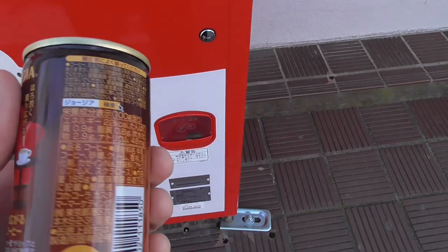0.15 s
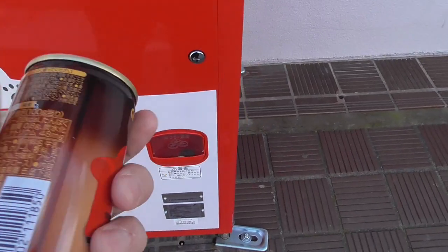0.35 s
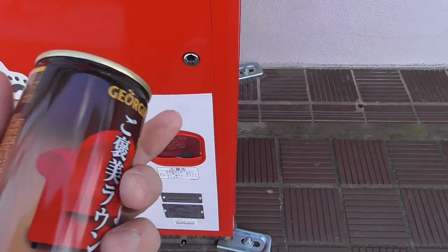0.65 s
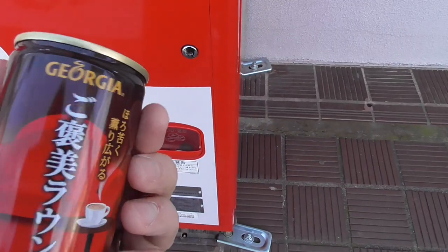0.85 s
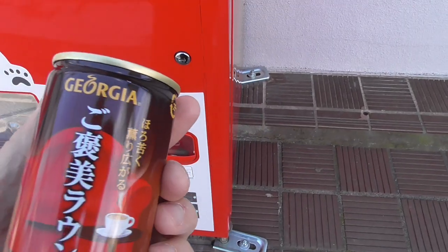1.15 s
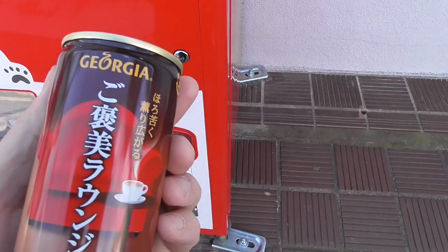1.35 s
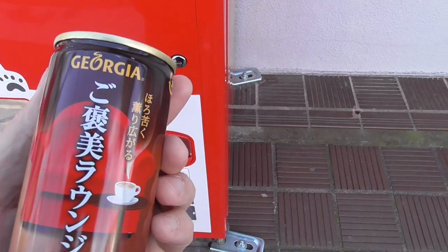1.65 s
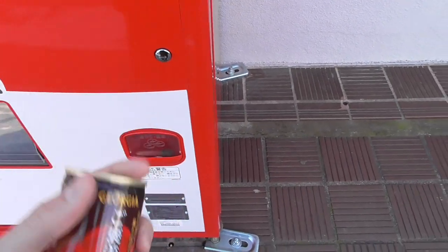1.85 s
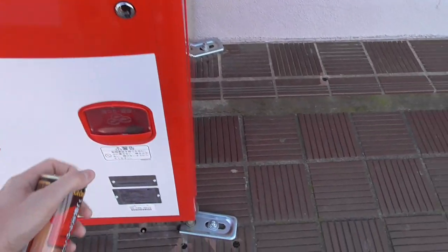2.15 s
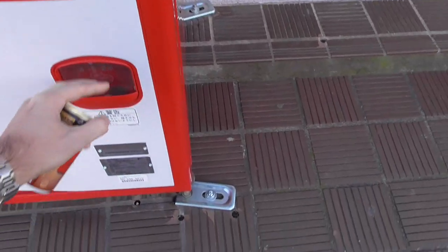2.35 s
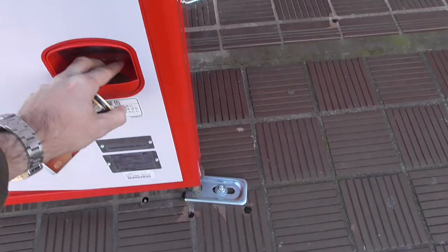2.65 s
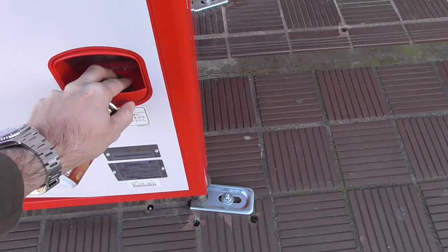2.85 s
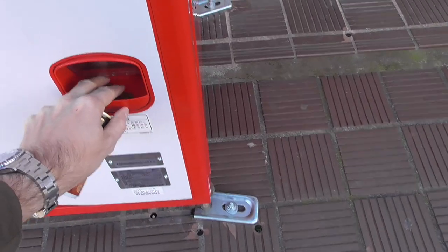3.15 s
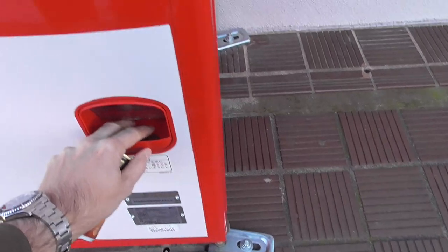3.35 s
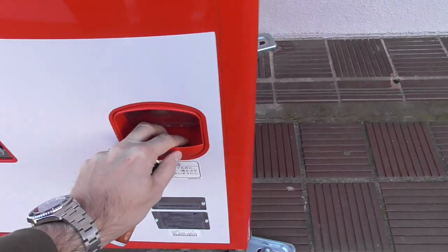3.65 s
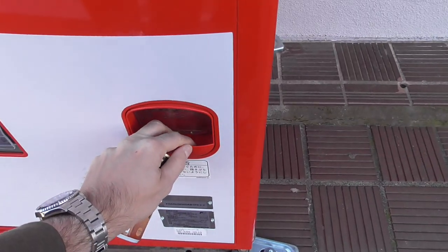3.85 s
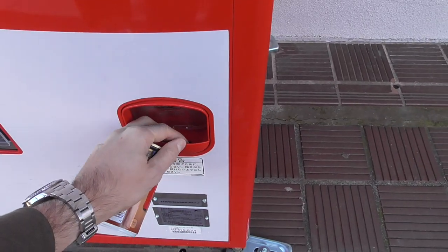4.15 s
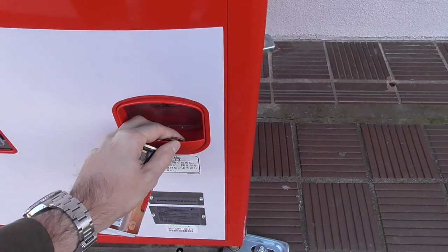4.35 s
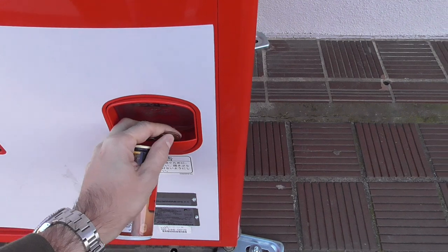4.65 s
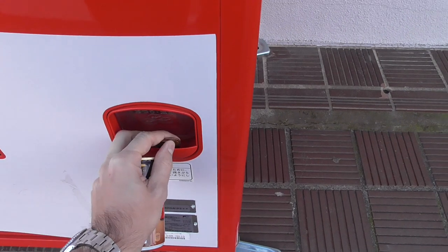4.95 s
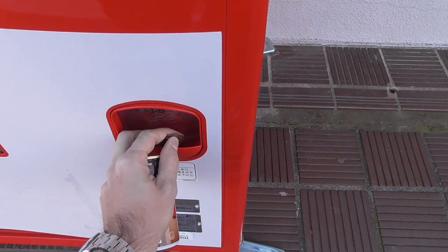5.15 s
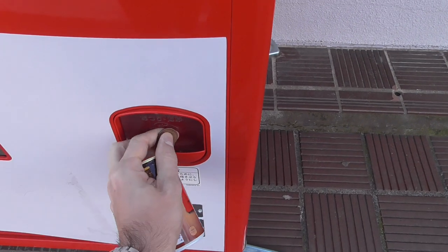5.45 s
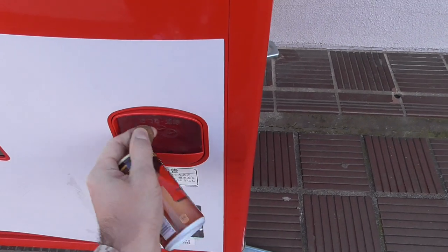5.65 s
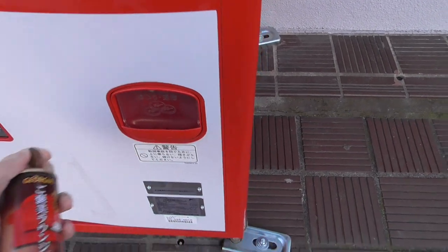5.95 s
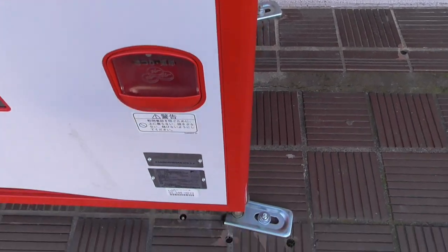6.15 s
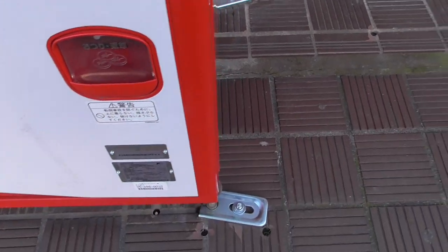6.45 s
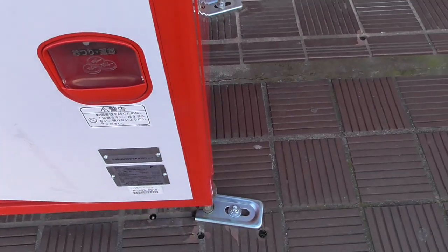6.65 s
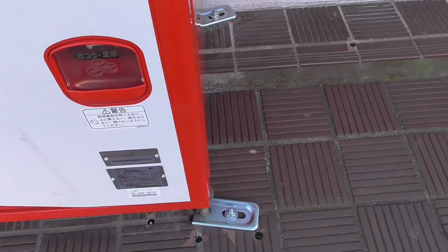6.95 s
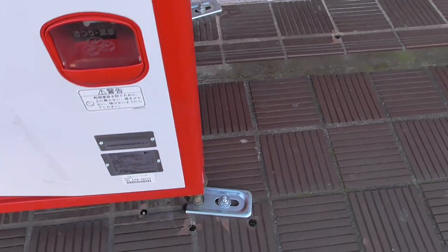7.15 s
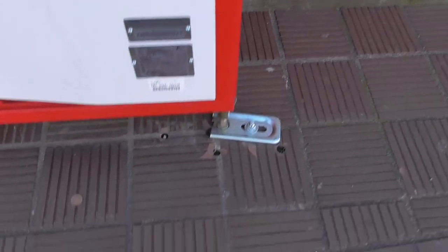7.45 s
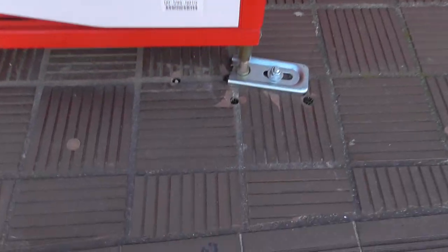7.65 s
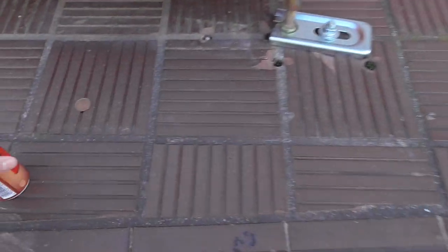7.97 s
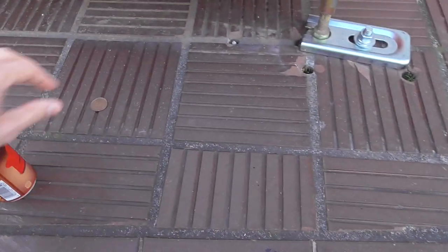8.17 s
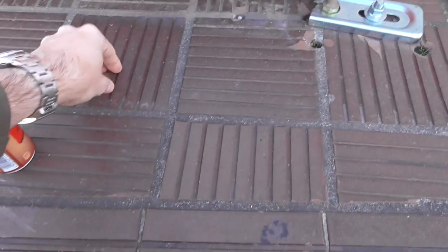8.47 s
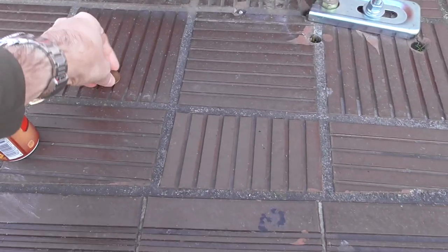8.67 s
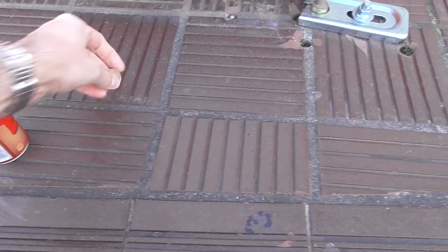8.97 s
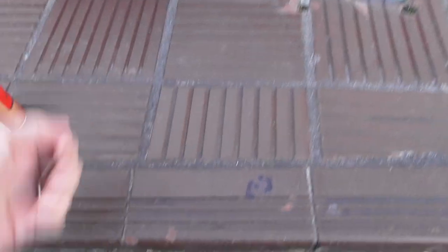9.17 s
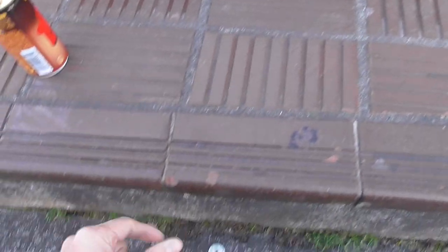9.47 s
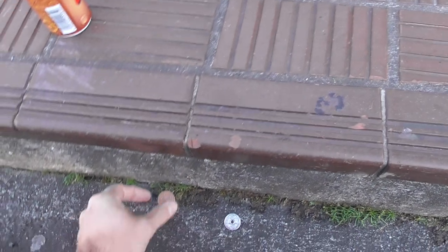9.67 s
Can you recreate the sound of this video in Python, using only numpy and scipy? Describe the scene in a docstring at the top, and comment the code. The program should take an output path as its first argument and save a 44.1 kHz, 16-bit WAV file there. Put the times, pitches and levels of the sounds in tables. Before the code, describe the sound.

Coins scrape and click in a plastic return cup on a humming machine, then drop ringing onto paving, roll and chatter flat before a full can clacks down.

```python
"""A drink machine hums on a quiet street while fingers fish change from its plastic return cup: filtered noise,
wavering sines, and stick-slip bursts through resonances, with the flap rasping, juddering and snapping.
Three coins then drop and tumble on the paving, their modes throbbing; grit creaks, and one coin rolls on its rim
until it chatters flat. A full can is stood on the tiles and rocks on modes of bent pitch; the coin is dragged off.
A gain control dips the level at loud peaks."""
import sys
import numpy as np
from scipy import signal
from scipy.fft import rfft, irfft, next_fast_len
from scipy.io import wavfile
from scipy.ndimage import uniform_filter1d, minimum_filter1d, map_coordinates

SR = 44100
rng = np.random.default_rng(int(sys.argv[2]) if len(sys.argv) > 2 else 0)


def bounce(signal):
    """Save signal as a 16-bit WAV file at the path given by the first command-line argument."""
    frames = np.transpose(np.atleast_2d(signal))
    limited = np.clip(frames, -1, 1)
    pcm = np.round(limited * 32767).astype(np.int16)
    wavfile.write(sys.argv[1], SR, pcm)


N = 432621
PORTS = np.array([[0], [1]])  # left, right: scales a phase lag


def amp(db):
    """Decibels to gain."""
    return 10 ** (np.asarray(db) / 20)


def unit(x):
    """Scale to rms 1."""
    return x / np.sqrt(np.mean(x ** 2) + 1e-20)


def peaked(x):
    """Scale to peak 1."""
    return x / np.abs(x).max()


def even(x, span_s):
    """Hold the running rms near 1 over span_s."""
    power = np.abs(uniform_filter1d(x * x, int(span_s * SR)))
    return x / np.sqrt(power + 1e-4 * np.mean(x * x))


def clock(count=N):
    """Sample times in seconds."""
    return np.arange(count) / SR


def along(points, hz):
    """Interpolate (Hz, value) points on a log axis."""
    f, v = np.transpose(points)
    return np.interp(np.log(hz + 1), np.log(f + 1), v)


def curves(rows):
    """One value per sample for each column after the time, -120 outside the rows."""
    s, *cols = np.transpose(rows)
    return [np.interp(clock(), s, c, left=-120, right=-120) for c in cols]


def wobble(rate_hz, count=N):
    """Smooth random curve, rate_hz knots a second."""
    knots = rng.standard_normal(int(count * rate_hz / SR) + 4)
    return map_coordinates(knots, [clock(count) * rate_hz])


def filtered(x, response):
    """Apply a complex response of frequency."""
    count = x.shape[-1]
    m = next_fast_len(count + 4096)
    return irfft(rfft(x, m) * response(np.fft.rfftfreq(m, 1 / SR)), m)[..., :count]


def coloured(x, spectrum, size=2048):
    """Minimum-phase filter with the gain of the (Hz, dB) points, via a folded cepstrum."""
    gain = amp(along(spectrum, np.fft.rfftfreq(size, 1 / SR)))
    cepstrum = irfft(np.log(gain))
    cepstrum[1:size // 2] *= 2
    cepstrum[size // 2 + 1:] = 0
    impulse = irfft(np.exp(rfft(cepstrum)))[:size]
    return signal.fftconvolve(x, impulse)[:len(x)]


def resonant(x, peaks):
    """Sum of (Hz, width Hz, dB) band-pass resonances of alternating sign."""
    def response(f):
        total = 0
        for k, (hz, width_hz, db) in enumerate(peaks):
            damping = 1j * f * width_hz
            total = total + (-1) ** k * amp(db) * damping / (hz * hz - f * f + damping)
        return total
    return filtered(x, response)


def varied(x, depth_db):
    """Each point of contact favours other resonances: a random fixed tint."""
    hz = np.geomspace(300, 16000, num=40)
    return coloured(x, np.transpose([hz, depth_db * rng.standard_normal(len(hz))]))


def shifting(x, depth_db):
    """A sliding contact changes its colour from moment to moment."""
    z = signal.stft(x, nperseg=256)[2]
    field = uniform_filter1d(rng.standard_normal(z.shape), size=3, axis=0)
    field = uniform_filter1d(field, size=5, axis=1)
    return signal.istft(z * amp(depth_db * unit(field)), nperseg=256)[1][:N]


CRISP_HZ, CRISP_EXPONENT = 11800, 0.53


def crisp(x, strength):
    """Harder contacts are crisper: treble above CRISP_HZ grows with strength (at 1 it is halved)."""
    top = filtered(x, lambda hz: 1 - 1 / (1 + (hz / CRISP_HZ) ** 20))
    return x + (strength ** CRISP_EXPONENT - 1.5) * top


def burst(t60_s, tail_db, tail_t60_s):
    """A contact: a crack of noise plus a tail with its own level and decay."""
    t = clock(SR // 4)
    return rng.standard_normal(len(t)) * (amp(-60 * t / t60_s) + amp(tail_db - 60 * t / tail_t60_s))


def impact_sizes(spread_db):
    """Signed random impact sizes, one per sample."""
    return rng.choice([-1, 1], N) * amp(spread_db * np.clip(rng.standard_normal(N), -2, 2))


def grains(rate_hz, spread_db):
    """Tiny impacts at random moments."""
    return (rng.random(N) < rate_hz / SR) * impact_sizes(spread_db)


TICK_JITTER, TICK_SPREAD_DB = .6, 3  # unevenness of pace (log) and size


def rim_ticks(rate_hz):
    """Uneven train of ticks at a nominal rate."""
    pace = np.maximum(rate_hz, 0) * np.exp(TICK_JITTER * wobble(70))
    turns = np.floor(np.cumsum(pace) / SR)
    return (np.diff(turns, prepend=0) > 0) * impact_sizes(TICK_SPREAD_DB)


def slipping(slips, t60_s):
    """Each slip sets off a decaying burst of noise; their powers add."""
    keep = amp(-120 / (t60_s * SR))
    return np.sqrt(signal.lfilter([1], [1, -keep], slips ** 2)) * rng.standard_normal(N)


def swells(rows):
    """Gain of Gaussian swells: (middle s, half-length s, dB)."""
    t = clock()
    return sum(amp(db) * np.exp(-np.minimum(((t - s) / half_s) ** 2 / 2, 20)) for s, half_s, db in rows)


ATTACK_S, RELEASE_DB_PER_S = 0.0042, 556


def stroke(start_s, length_s, change_db=0):
    """Gain of a stroke: fast bite, hold with drifting pressure, release as the pressure lifts."""
    t = np.clip(clock() - start_s, 0, 1)
    hold_db = change_db * np.minimum(t / length_s, 1)
    release_db = RELEASE_DB_PER_S * np.maximum(t - length_s, 0)
    return (1 - np.exp(-t / ATTACK_S)) * amp(hold_db - release_db)


def panned(x, pan_db):
    """Place a source, L-R in dB."""
    gains = amp([[pan_db / 2], [-pan_db / 2]])
    return x * gains / gains.mean()


def add(track, start_s, x):
    """Mix x into track at start_s."""
    part = track[..., round(start_s * SR):][..., :x.shape[-1]]
    part += x[..., :part.shape[-1]]


# left-right correlation of diffuse noise: freq_hz, likeness [-1..1]
LIKENESS = [(40, -0.092), (80, 0.85), (150, 0.98), (1000, 0.59), (10000, 0.17)]


def rush(spectrum):
    """Stereo noise of rms 1; the mid/side balance sets the left-right likeness."""
    def mid_side_gain(hz):
        turn = np.arccos(np.clip(along(LIKENESS, hz), -1, 1)) / 2
        return amp(along(spectrum, hz)) * [np.cos(turn), np.sin(turn)]
    mid, side = filtered(rng.standard_normal((2, N)), mid_side_gain)
    return unit(np.array([mid + side, mid - side]))


# traffic spectrum: freq_hz, density_db [dB per Hz]
TRAFFIC_SPECTRUM = [(15, -79.5), (25, -39.5), (56, -12), (190, -1), (363, -3.5), (394, -5), (516, -9),
                    (863, -12), (936, -15), (1020, -15), (1700, -30), (6050, -35.5), (8830, -32.5),
                    (14000, -36), (16000, -43.5)]
STREET_DB, STREET_SWAY_DB = -45, 0.48


def traffic():
    """Distant traffic: shaped noise with a random sway."""
    return amp(STREET_DB + STREET_SWAY_DB * wobble(14.0)) * rush(TRAFFIC_SPECTRUM)


# compressor and fan tones: freq_hz, back_db, at_cup_db, crouching_db
HUM_TONES = [(66.6, -64.5, -64, -58.5), (401, -50, -55.5, -53), (483.4, -59.5, -68.5, -64)]
# listening point moves in to the cup, then down to the ground: start and end of each move [s]
MOVE_TIMES_S = [2, 2.8, 7, 7.8]


def machine_hum():
    """Compressor and fan tones wander in level and phase; a whine rises as the listening point drops."""
    t = clock()
    out = np.zeros(N)
    for hz, back_db, cup_db, low_db in HUM_TONES:
        level_db = np.interp(t, MOVE_TIMES_S, [back_db, cup_db, cup_db, low_db]) + 0.71 * wobble(4)
        out += amp(level_db) * unit(np.sin(2 * np.pi * hz * t + 0.33 * wobble(5.4)))
    whine_db = np.interp(t, MOVE_TIMES_S[2:], [-68, -57])
    return out + amp(whine_db) * unit(np.sin(2 * np.pi * 935 * t + 1.3 * wobble(50)))


# hand bump spectrum: freq_hz, density_db [dB per Hz]
BUMP_SPECTRUM = [(20, -53), (50, -33.5), (100, -10), (165, 0.5), (222, 2), (290, 2.5), (650, -4.5),
                 (1200, -15), (2500, -43), (6000, -85)]
# shifts of grip: middle_s, half_length_s, level_db
GRIP_SHIFTS = [(.245, 0.021, -32), (1.12, 0.037, -36), (1.76, 0.072, -41), (2.09, 0.02, -39),
               (2.34, 0.021, -36), (3.07, 0.028, -32), (3.43, 0.019, -37), (3.55, 0.027, -37),
               (3.93, 0.085, -40.5), (4.92, 0.029, -39), (5.06, 0.014, -38.5), (5.385, 0.035, -37),
               (5.78, 0.069, -50), (7.228, 0.015, -30.5)]
FIDGET_DB, FIDGET_END_S = -53.5, 6.5


def hand_bumps():
    """Low noise swells as the grip shifts, over faint bumping while the hand is busy."""
    effort = swells(GRIP_SHIFTS) + amp(FIDGET_DB) * (clock() < FIDGET_END_S)
    return effort * amp(3.5 * wobble(35) - 2.5) * rush(BUMP_SPECTRUM)


# cloth spectrum: freq_hz, density_db [dB per Hz]
CLOTH_SPECTRUM = [(500, -19), (1500, -34), (4000, -2.5), (5500, -13.5), (8000, 3.5), (11000, 6),
                  (14000, -2), (16000, -16.5)]
# sleeve passing the microphone: middle_s, half_length_s, level_db
SLEEVE_BRUSHES = [(.13, 0.038, -51), (.61, 0.19, -57), (.97, 0.094, -57), (2.02, 0.24, -59),
                  (4.63, 0.039, -63), (7.95, 0.21, -57), (9.39, 0.13, -47.5), (9.8, 0.074, -57)]


def sleeve():
    """Cloth friction: noise with random flutter, in soft swells."""
    flutter_db = 5.2 * wobble(22) + 4.2 * wobble(130)
    return swells(SLEEVE_BRUSHES) * unit(amp(flutter_db) * rush(CLOTH_SPECTRUM))


# dull knocks of hand and can on the cabinet: start_s, peak_db, boom_peak_db
CABINET_KNOCKS = [(0.144, -24.5, -58), (1.647, -40, -36), (2.457, -21.5, -56), (2.487, -24, -56),
                  (2.69, -26, -30.5), (2.731, -27, -31.5), (4.313, -38, -39.5), (4.338, -25.5, -40),
                  (4.841, -27.5, -64), (5.646, -29.5, -57), (5.729, -19.5, -47), (7.131, -28, -65),
                  (7.222, -23.5, -54)]
# cabinet boom spectrum: freq_hz, density_db [dB per Hz]
BOOM_SPECTRUM = [(25, -40.0), (55, -21), (90, 4), (130, 4.5), (300, -37.5)]


def cabinet_knocks():
    """Each knock is a dull noise burst plus a lower boom of the cabinet."""
    out = np.zeros(N)
    for start_s, peak_db, boom_db in CABINET_KNOCKS:
        add(out, start_s, amp(peak_db) * peaked(coloured(burst(0.092, -9.0, 0.089), BUMP_SPECTRUM)))
        add(out, start_s, amp(boom_db) * peaked(coloured(burst(0.072, -14.0, 0.27), BOOM_SPECTRUM)))
    return out


# hand leaning on the door panel: middle_s, half_length_s, level_db
PANEL_PRESSES = [(2.625, 0.027, -36), (3.22, .035, -41), (3.91, 0.035, -42), (4.375, 0.018, -39),
                 (4.44, 0.0045, -35), (5.75, .018, -30)]
PANEL_HZ = 207


def panel_drone():
    """The pressed door panel drones briefly on one wavering mode."""
    return swells(PANEL_PRESSES) * unit(np.sin(2 * np.pi * PANEL_HZ * clock() + wobble(50)))


# coins and fingers across the cup: start_s, length_s, cup_db, metal_re_cup_db, pressure_change_db
CUP_SCRAPES = [(0.098, 0.051, -52.5, -1.5, 4), (1.067, 0.096, -48, -1, -4), (2.461, 0.025, -31.5, -5.5, -4),
               (2.507, 0.14, -32, 6, -11.5), (2.683, 0.028, -34.5, 0.5, 1.5),
               (2.752, 0.03, -43.5, -7, -6.5), (2.895, 0.066, -38.5, 1.5, -7), (2.994, 0.21, -43, -5, -6),
               (3.165, 0.044, -34.5, -3, -5.5), (3.21, 0.13, -36.5, 2, -8), (3.389, 0.037, -39, -2, 1),
               (3.528, 0.11, -47, -6, -7.5), (3.824, 0.13, -40, -5.5, -0.5), (3.948, 0.02, -39.5, -6, -2.5),
               (4.109, 0.011, -45, -1, -8), (4.573, 0.16, -57, -1, -3), (4.87, 0.092, -52.5, -10, -10.5),
               (5.533, 0.039, -41, 0, 2.5), (5.635, 0.087, -48.5, -12, -0.5)]
# plastic cup resonances: freq_hz, width_hz, level_db
CUP_MODES = [(660, 57, 4), (1007, 200, 1.5), (1340, 226, 3), (2022, 120, -1), (2300, 280, -6),
             (3410, 430, -3), (3966, 130, -6), (4540, 490, -9.5), (5800, 6800, -20)]
# bright coin metal spectrum: freq_hz, density_db [dB per Hz]
METAL_SPECTRUM = [(1500, -22.5), (4000, -11), (6300, -14.5), (8070, -3), (8600, -4.5), (10100, -2),
                  (12200, -5), (13050, 2), (13900, -11.5), (16000, -34.5)]
SLIPS_PER_S, SLIP_T60_S = 330, 0.012
METAL_GROWS = 1.35  # metal swing over pressure swing, in dB
HARD_STROKE_DB = -49  # stroke level of crispness strength 1


def scrapes():
    """Coins stick and slip on the plastic; each slip sounds in both cup and metal."""
    slips = grains(SLIPS_PER_S, 3.0) + 0.075 * rng.standard_normal(N)
    rattle = slipping(slips, SLIP_T60_S)
    plastic = even(shifting(resonant(slips, CUP_MODES), depth_db=3), 0.025)
    metal = even(shifting(coloured(rattle, METAL_SPECTRUM), depth_db=7.0), 0.031)
    on_cup, on_metal = np.zeros(N), np.zeros(N)
    for start_s, length_s, cup_db, metal_db, change_db in CUP_SCRAPES:
        on_cup += amp(cup_db) * stroke(start_s, length_s, change_db)
        on_metal += amp(cup_db + metal_db) * stroke(start_s, length_s, METAL_GROWS * change_db)
    bright = on_metal * crisp(metal, on_metal / amp(HARD_STROKE_DB))
    return panned(on_cup * plastic, 1.2) + panned(bright, -1.5)


# coins and flap against the cup: start_s, bright_peak_db, cup_re_bright_db
CUP_CLICKS = [(0.1412, -40.5, 9), (0.69, -31, -34), (1.105, -27.5, -18), (2.4595, -37, 7.5),
              (2.5112, -6, -15.5), (2.5671, -12, -8), (2.686, -27.5, 4.5), (2.7033, -16, -10),
              (2.9177, -24.5, -3.5), (3.021, -25, -13), (3.179, -7.5, -12), (3.2195, -18.5, -10),
              (3.2255, -15, -5.5), (3.305, -18.5, -8), (3.3952, -26.5, -15.5), (3.513, -35.5, 1.5),
              (3.535, -32, -2), (3.543, -21, -25), (3.556, -35, -10), (3.578, -34, -3), (3.608, -28.5, -6),
              (3.8422, -24, -6), (3.876, -12.5, -13), (4.123, -21.5, -6), (4.314, -30, 0.5),
              (4.494, -36.5, -1), (4.866, -35.5, 1), (4.997, -39, 3), (5.037, -36.5, 3.5),
              (5.059, -39.5, 0), (5.083, -40, 3.5), (5.123, -37, 3.5), (5.5127, -8.5, -4.5),
              (5.522, -5, -20), (5.54, -22, -9), (5.5747, -15.5, -10.5), (5.599, -31, -12),
              (5.6432, -17, 0), (5.73, -11.5, -4.5)]
HARD_CLICK_DB = -28  # crispness strength stops growing here


def cup_clicks():
    """Each click, judder ticks included, is a bright metal burst and a hollow burst in the cup."""
    out = np.zeros((2, N))
    for start_s, bright_db, cup_db in list(CUP_CLICKS) + judder_ticks():
        bright = varied(coloured(burst(0.0056, 4.0, 0.023), METAL_SPECTRUM), depth_db=4.0)
        bright = peaked(crisp(bright, amp(min(bright_db - HARD_CLICK_DB, 0))))
        hollow = peaked(varied(resonant(burst(0.0098, -0.5, 0.055), CUP_MODES), depth_db=2.5))
        click = panned(bright, -3.1) + panned(amp(cup_db) * hollow, 1.2)
        add(out, start_s, amp(bright_db) * click)
    return out


# fingers dragging on the flap: start_s, length_s, level_db, nominal_slips_per_s
FLAP_RUBS = [(3.002, 0.19, -51.5, 300), (3.798, 0.11, -51.5, 180), (5.284, 0.29, -50, 260)]
# flap resonances: freq_hz, width_hz, level_db
FLAP_MODES = [(2020, 220, -7), (3120, 160, 1), (3370, 51, 1), (3770, 90, 0), (4610, 220, -5),
              (8000, 3200, -11.5)]


def flap_rasp():
    """Quick uneven slips of the fingers excite the flap's resonances."""
    out = np.zeros(N)
    for start_s, length_s, level_db, rate_hz in FLAP_RUBS:
        rasp = even(resonant(slipping(rim_ticks(rate_hz), 0.019), FLAP_MODES), 0.024)
        out += amp(level_db) * stroke(start_s, length_s) * rasp
    return panned(out, 1.2)


JUDDER_S, JUDDER_GAP_S, JUDDER_SHRINK = 3.681, .031, .8  # start, first gap, gap ratio
JUDDER_DB, JUDDER_GROWTH_DB, JUDDER_CUP_DB = -36, 0.3, 1  # first peak, growth a tick, cup re bright


def judder_ticks(count=8):
    """Click rows of the flap juddering over the fingers: gaps shrink by a steady ratio."""
    rows = []
    for k in range(count):
        start_s = JUDDER_S + JUDDER_GAP_S * np.sum(JUDDER_SHRINK ** np.arange(k))
        rows.append((start_s, JUDDER_DB + JUDDER_GROWTH_DB * k, JUDDER_CUP_DB))
    return rows


def walls(x):
    """Cabinet and house front throw back a short, diffuse answer: decaying stereo noise."""
    t = clock(SR // 3)
    tail = rng.standard_normal((2, len(t))) * amp(-60 * t / 0.099) * (t > .003)
    return signal.fftconvolve(x, tail / np.linalg.norm(tail[0]), axes=1)[:, :N]


# ring modes, one list per coin: freq_hz, level_db, t60_s
COIN_MODES = [
    [(11290, -3, 1.0), (11345, -4, .9), (11415, -2, .9), (11475, -8, .8)],
    [(11505, -2, 1.0), (11595, -1, 1.0), (11412, 0, .9)],
    [(12936, 0, .33), (7685, -31, .8), (7510, -31, .9), (7553, -31, .9), (7777, -26, .9)],
]
# coin strikes: start_s, coin_index, click_peak_db, ring_db, initial_throbs_per_s, pan_db [L-R]
COIN_BOUNCES = [(5.54, 1, -32, -39, 24, -6), (5.9097, 0, 3, -9.5, 25, -9.5), (5.9132, 0, 9, -5.5, 23, -3),
                (6.1998, 1, 2.5, -1.5, 40, -4.5), (6.278, 2, -8, -34.5, 15, -10.5),
                (6.509, 1, -26, -16, 11, -4), (6.589, 2, 15, 7, 39.5, -4), (6.592, 2, 14.5, 0.5, 13.5, 14),
                (6.677, 0, -7, -27, 16, 2), (6.7014, 2, 9.5, 4, 50, -7.5), (6.706, 2, 9.5, -2, 15, 9),
                (6.897, 2, 7, 6.5, 3.5, -10), (8.987, 2, -15.5, -67, 2, 6.5)]
# metal on stone spectrum: freq_hz, density_db [dB per Hz]
EDGE_SPECTRUM = [(200, -28), (1000, -28.5), (3000, -26.5), (5500, -22.5), (8000, -1.5), (10000, 0),
                 (12500, 4), (14000, -9.5), (16000, -24.5)]
THROB_DEPTH, THROB_UNEVEN_RAD = 0.53, 0.78  # edge-on fade; wander of the spin
WAVER_RAD_PER_THROB, SPIN_DRAG = 0.026, .2  # faster tumbling smears pitch and slows sooner


def falling_coins():
    """A click, then modes that throb and waver as the disc tumbles, until that coin lands again or 1 s passes."""
    out, t = np.zeros((2, N)), clock(SR)
    for start_s, coin, click_db, ring_db, throbs_per_s, pan_db in COIN_BOUNCES:
        flight_s = 1
        for later_s, same, *_ in COIN_BOUNCES:
            if round(same) == round(coin) and later_s > start_s + .02:
                flight_s = min(flight_s, later_s - start_s)
        ring = np.zeros((2, SR))
        for hz, db, t60_s in COIN_MODES[round(coin)]:
            waver = WAVER_RAD_PER_THROB * throbs_per_s * wobble(60, count=SR) + .03 * wobble(430, count=SR)
            phase = 2 * np.pi * (hz * t + rng.random()) + waver + 0.38 * PORTS
            ring += amp(db - 60 * t / t60_s) * np.sin(phase)
        turns = np.log1p(SPIN_DRAG * throbs_per_s * t) / SPIN_DRAG
        tumble = np.pi * turns + THROB_UNEVEN_RAD * wobble(14, count=SR) + 0.29 * PORTS
        facing = 1 - THROB_DEPTH * np.sin(tumble) ** 2
        aloft = uniform_filter1d(1. * (t < flight_s), size=60) * (1 - np.exp(-t / 0.00021))
        click = peaked(coloured(burst(.006, -31, .05), EDGE_SPECTRUM))
        add(out, start_s, panned(amp(click_db) * click, pan_db))
        add(out, start_s, panned(amp(ring_db) * ring * facing * aloft, pan_db))
    return out


# coin edge against a tile edge: start_s, tick_peak_db, stone_re_tick_db
TILE_TRIPS = [(6.199, -10, -11), (6.2808, -12, -14), (6.31, -13, -9), (6.384, -23, 3), (6.4043, -18, 1.5),
              (6.5085, -14, -5.5), (7.0688, -10, -2), (8.641, -22.5, -18), (8.983, -19.5, -5)]
# shoe on grit: start_s, length_s, level_db, pressure_change_db
SHOE_SCUFFS = [(6.259, 0.036, -37, -3), (6.294, 0.028, -30.5, -3.5), (6.381, 0.023, -27, -13.5)]
# grit resonances under a shoe: freq_hz, width_hz, level_db
GRIT_MODES = [(269, 38, -1.5), (494, 26, 2.5), (1286, 90, -1), (1560, 200, -6), (2297, 79, -1.5),
              (2920, 78, -2), (3330, 200, -6.5), (5300, 1900, -16.5)]
# coin face on the tile, settling and dragged off: start_s, length_s, rim_db, upper_mode_db, stone_db
FACE_CHATTERS = [(7.513, 0.057, -29, -34, -37.5), (8.571, 0.048, -36, -30, -68)]
# coin rim on tile spectrum: freq_hz, density_db [dB per Hz]
RIM_SPECTRUM = [(300, -61), (3000, -23), (6200, -17.5), (7800, 4.5), (10000, 1.5), (12600, 1.5),
                (13600, -13.5), (16000, -32.5)]
# struck stone spectrum: freq_hz, density_db [dB per Hz]
STONE_SPECTRUM = [(300, -3.5), (1300, 1.0), (3000, -4.0), (5500, 7.0), (9000, -23), (15000, -40.5)]


def paving():
    """Rims trip in the grooves, stone crunches under the chatter, grit creaks in narrow resonances."""
    crunch = even(varied(coloured(grains(1100, 4.6), STONE_SPECTRUM), depth_db=-1.0), 0.06)
    creak = even(resonant(grains(500, 5), GRIT_MODES), 0.042)
    out = np.zeros(N)
    for start_s, length_s, level_db, change_db in SHOE_SCUFFS:
        out += amp(level_db) * stroke(start_s, length_s, change_db) * creak
    for start_s, length_s, _, _, stone_db in FACE_CHATTERS:
        out += amp(stone_db) * stroke(start_s, length_s) * crunch
    for start_s, tick_db, stone_db in TILE_TRIPS:
        tick = peaked(coloured(burst(0.0026, -7.0, 0.034), RIM_SPECTRUM))
        knock = peaked(coloured(burst(0.0063, 0, 0.024), STONE_SPECTRUM))
        add(out, start_s, amp(tick_db) * (tick + amp(stone_db) * knock))
    return panned(out, -0.61)


# fine rim ticks of the third coin: time_s, level_db
ROLL_TICKS = [(6.925, -32), (7.06, -40), (7.1, -32), (7.15, -36), (7.2, -35), (7.24, -38), (7.27, -28),
              (7.31, -37), (7.39, -34), (7.51, -39)]
# resonance of the skidding rim: freq_hz, width_hz, level_db
SKID_MODE = [(7000, 1000, 0)]
TICKS_PER_S, TICKS_GAIN_PER_S2 = 60, 190  # ticks crowd as the circle tightens
LEAN_S, LEAN_RISE_S, LEAN_FADE_DB_PER_S = 7.375, 0.012, 145
UPRIGHT_DB, LEANING_DB = -38.5, -17.5  # lower modes: throughout; added at the lean, before rise and fade
CHATTERS_PER_S, CHATTER_LOWER_DB = 1300, -10  # contacts a second; lower modes re rim
RING_RISE_S, SKID_DB = 0.00084, -42.5


def disc_mode(hz, lag_rad):
    """Stereo impulse response of one disc mode: brief build-up, then decay."""
    t = clock(SR // 3)
    envelope = amp(-60 * t / 0.094) * (1 - np.exp(-t / RING_RISE_S))
    return np.sin(2 * np.pi * hz * t + lag_rad * PORTS) * envelope


def disc_ringing(contacts, modes):
    """Disc modes driven by contacts over faint noise, at steady rms."""
    drive = (contacts + 0.011 * rng.standard_normal(N))[None]
    return even(signal.fftconvolve(drive, modes, axes=1)[:, :N], 0.096)


def disc_contacts(contacts, rim_gain, lower_gain):
    """Contacts heard as dry rim ticks and through the lower modes."""
    dry_ticks = slipping(contacts, 0.0021) + 0.072 * rng.standard_normal(N)
    grit = even(coloured(dry_ticks, RIM_SPECTRUM), 0.065)
    lower_modes = sum(disc_mode(hz, 0.45) for hz, _, _ in COIN_MODES[2][1:])
    return panned(rim_gain * grit, -5.0) + panned(lower_gain * disc_ringing(contacts, lower_modes), 2.4)


def rolling_coin():
    """Rim ticks crowd into a buzz; the lean wakes the lower modes and the rim skids; the face then chatters."""
    t = clock()
    start_s, end_s = ROLL_TICKS[0][0], ROLL_TICKS[-1][0]
    tick_db, = curves(ROLL_TICKS)
    rate_hz = TICKS_PER_S + TICKS_GAIN_PER_S2 * (t - start_s)
    since_s = np.maximum(t - LEAN_S, 0)
    rise = np.minimum(since_s / LEAN_RISE_S, 1)
    lean = rise * amp(LEANING_DB - LEAN_FADE_DB_PER_S * since_s)
    rolling = uniform_filter1d(1. * (t > start_s) * (t < end_s), size=900)
    out = disc_contacts(rim_ticks(rate_hz), amp(tick_db), rolling * (amp(UPRIGHT_DB) + lean))
    skid = resonant(resonant(slipping(rim_ticks(rate_hz), .006), SKID_MODE), SKID_MODE)
    out += amp(SKID_DB) * rolling * rise * even(skid, 0.041)

    chatter = grains(CHATTERS_PER_S, 3.3)
    rim, upper = np.zeros(N), np.zeros(N)
    for start_s, length_s, rim_db, upper_db, _ in FACE_CHATTERS:
        rim += amp(rim_db) * stroke(start_s, length_s)
        upper += amp(upper_db) * stroke(start_s, length_s)
    out += disc_contacts(chatter, rim, amp(CHATTER_LOWER_DB) * rim)
    upper_hz = COIN_MODES[2][0][0]
    return out + panned(upper * disc_ringing(chatter, disc_mode(upper_hz, 1.3)), -8.0)


# rim of the rolling coin tapping the tile: start_s, tick_peak_db, upper_mode_db
ROLL_TAPS = [(6.965, -6, -7), (7.005, -10, -28), (7.038, -11, -11.5), (7.072, -9, -24),
             (7.095, -6.5, -14.5), (7.121, -17, -20.5), (7.17, -19, -15), (7.184, -14, -13),
             (7.189, -11, -12), (7.209, -9, -12), (7.247, -22, -15), (7.258, -18, -22), (7.267, -18, -7.5),
             (7.279, -13, -6.5), (7.31, -11, -11), (7.335, -5, -24), (7.339, -9, -10), (7.348, -10, -8),
             (7.393, -15, -21.5), (7.43, -13, -16), (7.456, -23, -24), (7.481, -23, -16.5),
             (7.511, -20, -36)]
TAP_FADE_DB_PER_S = 102


def rim_taps():
    """Each dry tap resets the upper mode's level and phase; it fades until the next tap or the coin lies flat."""
    out, t = np.zeros((2, N)), clock()
    for start_s, tick_db, _ in ROLL_TAPS:
        tick = peaked(coloured(burst(0.0015, -18, 0.047), RIM_SPECTRUM))
        add(out, start_s, panned(amp(tick_db) * tick, -1.5))
    starts_s, _, ring_db = np.transpose(sorted(ROLL_TAPS))
    last = np.maximum(np.searchsorted(starts_s, t) - 1, 0)
    phase = np.cumsum(rng.normal(0, 0.36, len(starts_s)))[last]
    flat_s = sum(FACE_CHATTERS[0][:2])
    fade_db = TAP_FADE_DB_PER_S * np.abs(t - starts_s[last])
    gain = (t > starts_s[0]) * (t < flat_s) * amp(ring_db[last] - fade_db)
    mode = np.sin(2 * np.pi * COIN_MODES[2][0][0] * t + phase + 2.0 * PORTS)
    return out + panned(uniform_filter1d(gain, size=40) * mode, -7)


# can modes: freq_hz, struck_db, rocking_db, t60_s
CAN_MODES = [(450, -12, -26, .13), (650, -22, -8, .07), (750, -10, -9, .4), (1055, -2, -15, .09),
             (1180, -4, -19, .15), (1400, -1, -19, .06), (2175, -4, 0, .18), (2240, 1, -4, .09),
             (2326, -6, -12, .08), (3004, -4, -20, .06), (3208, -6, -13, .11), (3330, -7, -14, .11),
             (3601, -2.5, -27, .17), (7330, -18, -40, .11)]
# base hitting the tile: start_s, peak_db
CAN_STANDS = [(7.967, -5.5), (7.978, -33), (8.042, -28)]
# rocking on the rim: start_s, peak_db, tilt_db_per_octave, wall_bend_hz
CAN_ROCKS = [(8.043, -27.5, 0, -31), (8.053, -22.5, 3.5, 23), (8.117, -12.5, 4, -30), (8.16, -27, -1, 90),
             (8.277, -29.5, -6.5, 100)]
# range of the wall modes: low_hz, high_hz
WALL_RANGE_HZ = (2000, 3500)
# can on tile spectrum: freq_hz, density_db [dB per Hz]
CLACK_SPECTRUM = [(30, -38.5), (150, -4.5), (420, 6), (800, -2), (1350, -1.5), (3200, -9.5),
                  (4500, -24.0), (8000, -15.0), (15000, -28.5)]
ROCK_HZ, BEND_HZ_PER_S = 2170, 1100  # pivot of the tilt; rise of the wall modes as the can tips
ROCK_RISE_S, ROCK_DAMPING_DB_PER_S = 0.0011, 300  # swell; extra wall damping by the tile


def can():
    """The full can clacks on the tile, then rocks in short swells whose wall modes bend upward."""
    out, t = np.zeros(N), clock(SR // 2)
    hz, struck_db, rocking_db, t60_s = np.transpose(CAN_MODES)[:, :, None]
    wall = (hz > WALL_RANGE_HZ[0]) & (hz < WALL_RANGE_HZ[1])

    def ring(db, bend_hz=0):
        """Sum of modes; the sloshing drink makes the upper ones waver."""
        slosh = [rng.random() + 0.14 * soft * wobble(83, count=len(t)) for soft in hz > WALL_RANGE_HZ[0]]
        cycles = (hz + wall * bend_hz) * t + np.array(slosh)
        gain = amp(db + rng.normal(0, 1, hz.shape) - 60 * t / t60_s)
        return np.sum(gain * np.sin(2 * np.pi * cycles), axis=0)

    for start_s, peak_db in CAN_STANDS:
        add(out, start_s, amp(peak_db) * peaked(coloured(burst(.007, -20, .05), CLACK_SPECTRUM)))
        add(out, start_s, amp(peak_db - 7.0) * peaked(ring(struck_db)))
    for start_s, peak_db, tilt_db, bend_hz in CAN_ROCKS:
        modes_db = rocking_db + tilt_db * np.log2(hz / ROCK_HZ) - ROCK_DAMPING_DB_PER_S * t * wall
        # half the slope: phase is the integral of pitch
        rock = ring(modes_db, bend_hz + BEND_HZ_PER_S * t / 2) * (1 - np.exp(-t / ROCK_RISE_S))
        add(out, start_s, amp(peak_db) * peaked(rock))
        thud = peaked(coloured(burst(0.055, -19, 0.081), CLACK_SPECTRUM))
        add(out, start_s - .002, amp(peak_db - 6.5) * thud)
    return panned(out, 3.6)


def scene():
    """Cup, can and paving sound against the cabinet; the coins ring in the open air."""
    street = panned(traffic() + machine_hum(), 0.64)
    hand = panned(hand_bumps() + sleeve() + cabinet_knocks() + panel_drone(), 0.91)
    near = scrapes() + cup_clicks() + flap_rasp() + paving() + can()
    coins = falling_coins() + rolling_coin() + rim_taps()
    return street + hand + near + amp(-10.0) * walls(near) + coins


TOP_HZ = 15900


def record(dry):
    """Gain control: drops at once on peaks over -3.07 dB and creeps back; then the band limit."""
    peak_db = 20 * np.log10(np.abs(dry).max(axis=0) + 1e-9)
    over_db = np.maximum(peak_db + 3.07, 1e-9)
    release = clock() / 0.32  # time constant in s
    held_db = np.exp(np.maximum.accumulate(np.log(over_db) + release) - release)
    gain = uniform_filter1d(minimum_filter1d(amp(-held_db), size=24), size=24)
    return filtered(dry * gain, lambda hz: 1 / np.sqrt(1 + (hz / TOP_HZ) ** 90))


dry = scene()
out = record(dry)
bounce(out)
```